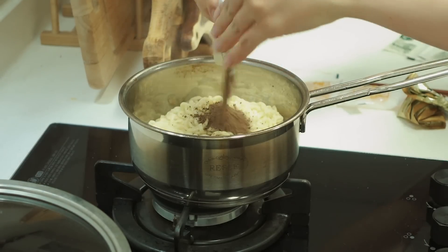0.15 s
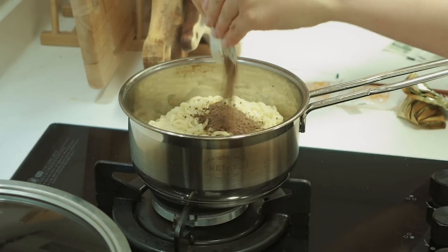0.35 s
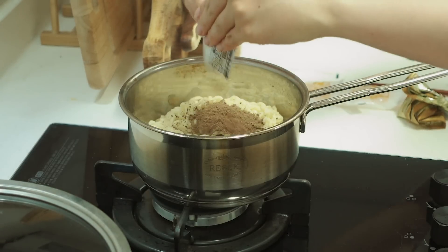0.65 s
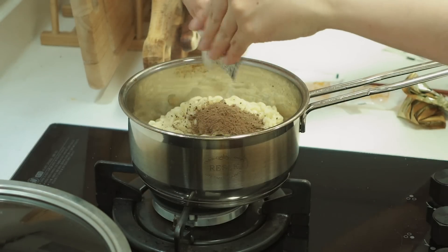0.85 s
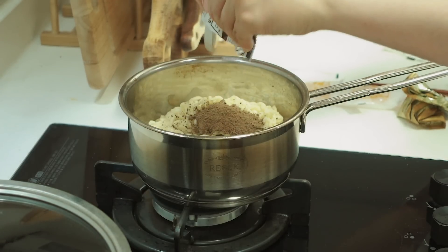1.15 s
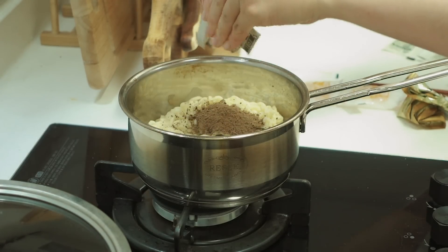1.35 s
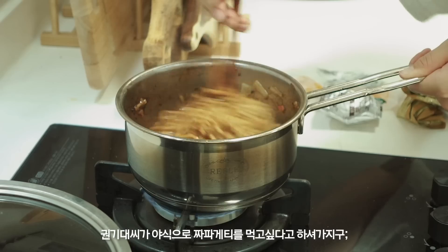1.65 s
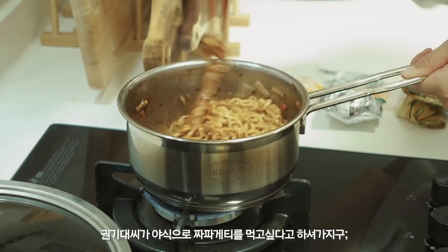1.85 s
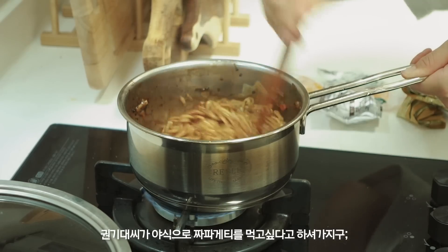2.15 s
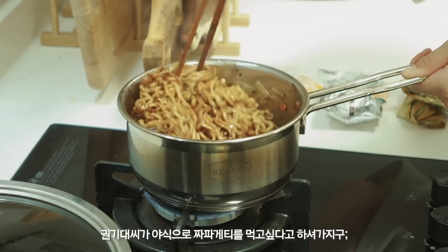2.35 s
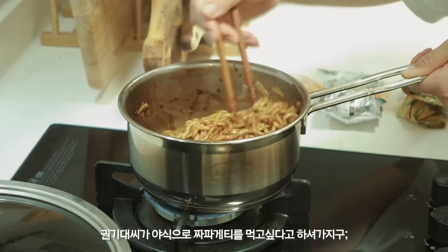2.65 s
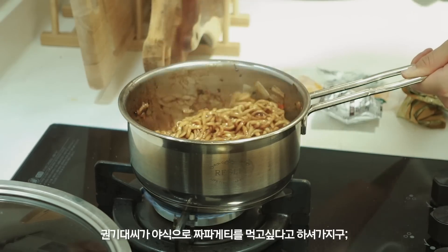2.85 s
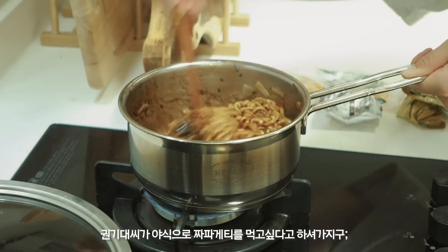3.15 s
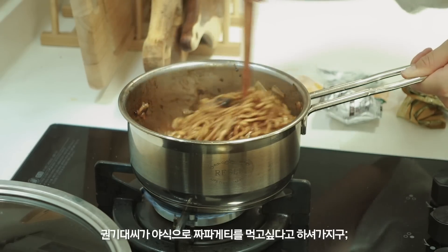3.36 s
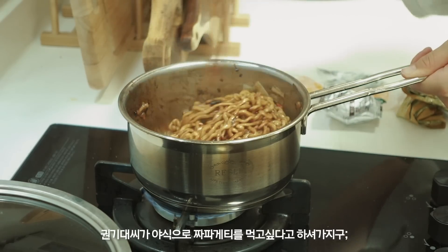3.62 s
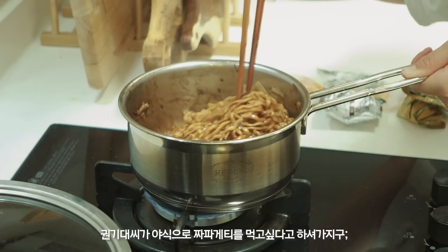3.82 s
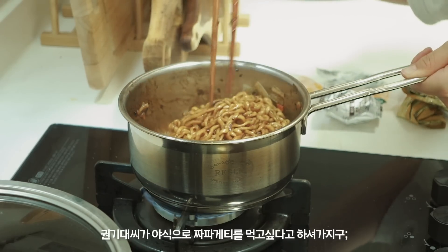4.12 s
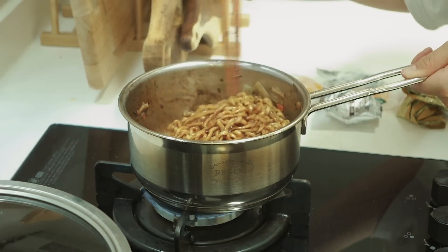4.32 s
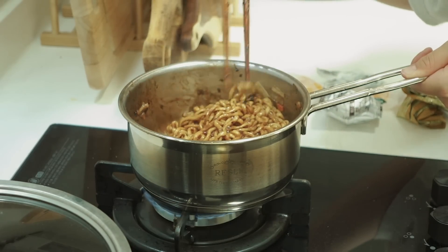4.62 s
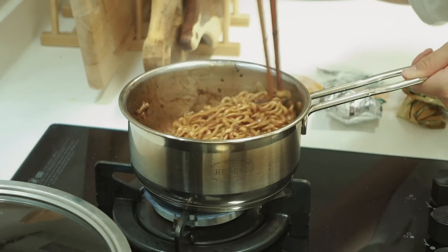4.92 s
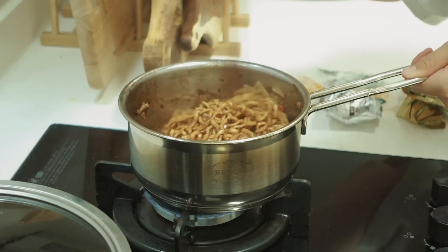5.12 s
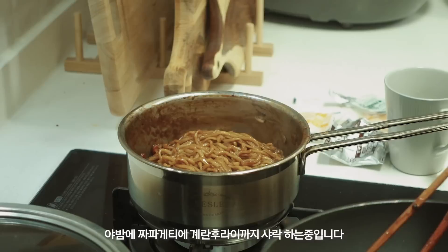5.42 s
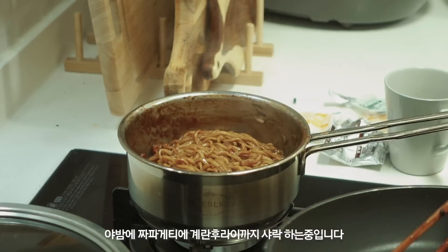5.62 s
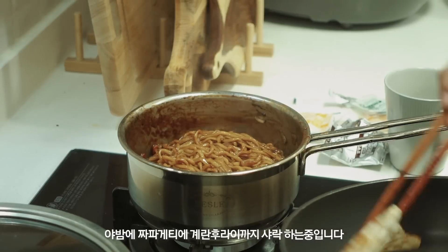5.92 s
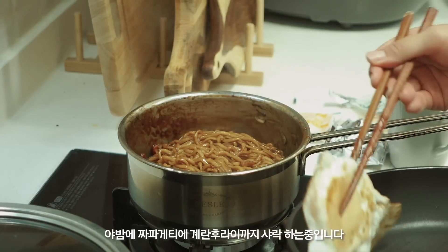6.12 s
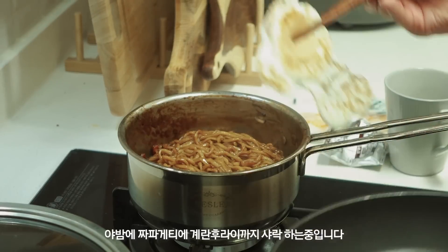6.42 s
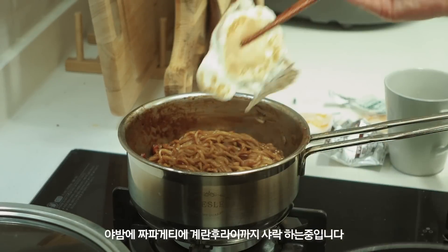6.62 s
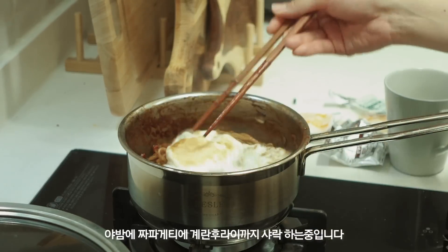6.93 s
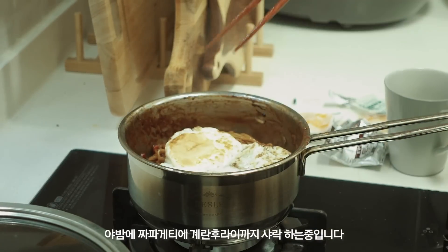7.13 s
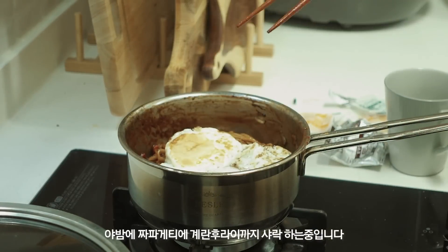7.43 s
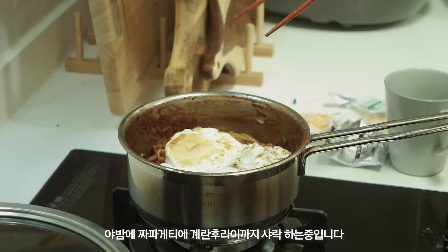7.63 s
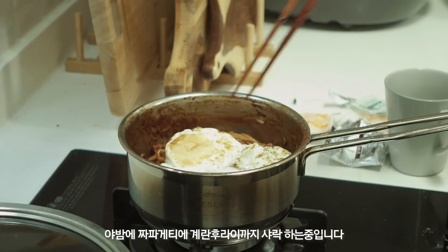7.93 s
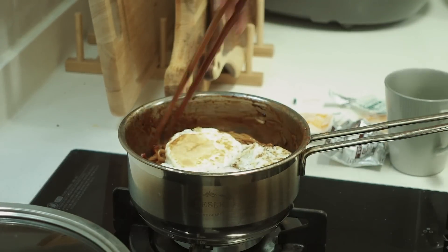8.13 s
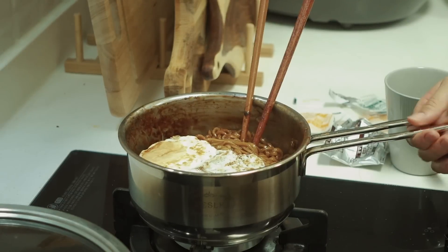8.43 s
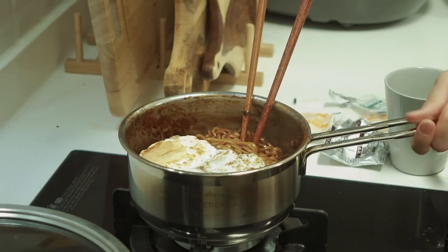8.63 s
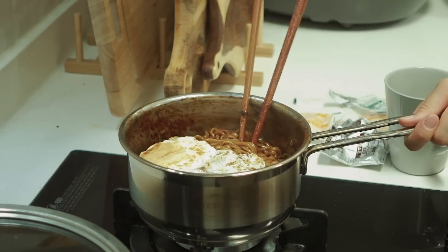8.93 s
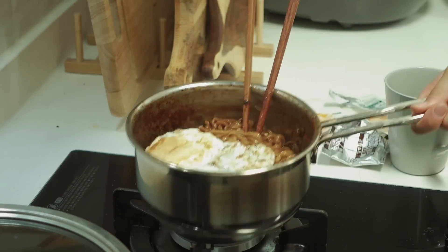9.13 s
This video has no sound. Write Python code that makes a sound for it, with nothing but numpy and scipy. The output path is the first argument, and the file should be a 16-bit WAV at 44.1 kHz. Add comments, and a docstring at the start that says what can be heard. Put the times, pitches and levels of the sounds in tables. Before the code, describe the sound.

A foil sachet crinkles, then noodles sizzle in a steel saucepan as chopsticks click and the pan knocks, over a fan's hum.

```python
"""A foil sachet taps and crinkles as it is shaken out over a steel saucepan.
Then noodles in sauce sizzle and spit while chopsticks stir them: a hiss of steam full of tiny pops.
The pan squeaks as it sticks and slips on its grate, and rings when knocks land on the hob.
Behind it all an extractor fan hums, and the small kitchen adds a short echo."""
import sys
import numpy as np
from scipy import signal
from scipy.fft import rfft, irfft, next_fast_len
from scipy.io import wavfile
from scipy.ndimage import uniform_filter1d

SR = 44100
rng = np.random.default_rng(int(sys.argv[2]) if len(sys.argv) > 2 else 0)


def materialize(psi):
    """Save the field psi as 16-bit PCM at rate SR to the path in sys.argv[1].

    A 1-D psi becomes a single channel; in a 2-D psi each row is a channel.
    """
    bounded = np.clip(np.atleast_2d(psi).T, -1, 1)
    quanta = np.round(bounded * 32767).astype(np.int16)
    wavfile.write(sys.argv[1], SR, quanta)


N = 408807
TIME = np.arange(N) / SR


def undb(db):
    """Turn decibels into a plain gain."""
    return 10 ** (np.asarray(db) / 20)

def unit(x):
    """Scale a sound to an average (rms) level of 1."""
    return x / np.sqrt(np.mean(x ** 2))

def fade(n, fade_s):
    """A fade n samples long. A fade time is always the time taken to drop by 60 dB."""
    return 1000. ** (-np.arange(n) / (fade_s * SR))

def colour(x, db_of):
    """Change the tone with a curve that gives a gain in dB for each frequency."""
    size = next_fast_len(x.shape[-1])
    hz = np.fft.rfftfreq(size, 1 / SR) + 1
    return irfft(rfft(x, size) * undb(db_of(hz)), size)[..., :x.shape[-1]]

def curve(table):
    """Join (frequency [Hz], level [dB]) points into a tone curve."""
    hz_points, db_points = np.transpose(table)
    return lambda hz: np.interp(np.log(hz), np.log(hz_points), db_points)

def band(x, low_hz, high_hz):
    """Keep the sound between two frequencies."""
    return signal.sosfilt(signal.butter(2, [low_hz, high_hz], "band", fs=SR, output="sos"), x)

def ring(push, tones):
    """A pushed object rings with several tones, each fading at its own speed."""
    sound = 0
    for hz, db, fade_s in tones:
        pole = np.exp(2j * np.pi * hz / SR - np.log(1000) / (fade_s * SR))
        sound += undb(db) * signal.lfilter([1], [1, -pole], push).imag
    return sound

def clicks(per_s, spread_db):
    """Scattered clicks of very unequal size."""
    hits = (rng.random(N) < per_s / SR) * rng.standard_normal(N)
    return unit(hits * undb(spread_db * np.minimum(rng.exponential(size=N), 5)))

def wobble(per_s):
    """Glide between random values, mostly within -1 to 1."""
    step = int(SR / per_s)
    held = np.repeat(rng.standard_normal(N // step + 1), step)
    return 1.2 * uniform_filter1d(held, step)[:N]


# How wide the low and high sounds spread: (frequency [Hz], side gain [dB])
STEREO_WIDTH = [(30, 8), (120, -4.5), (2000, -2), (8000, 0.5)]
def stereo(middle, side, side_db):
    """Add the side sound on the left and subtract it on the right, to give width."""
    side = undb(side_db) * colour(side, curve(STEREO_WIDTH))
    return np.array([middle + side, middle - side])

def kitchen(x, fade_s=0.24, echo_db=-8.5):
    """The walls add a short wash of echoes, a little different for each ear."""
    t = np.arange(int(0.4 * SR)) / SR
    onset = np.clip(t / 0.001 - 1, 0, 1)
    middle, side = rng.standard_normal((2, len(t))) * fade(len(t), fade_s) * onset
    echoes = stereo(middle, side, side_db=-5.5) * undb(echo_db) / np.linalg.norm(middle)
    return x + signal.fftconvolve(x[None], echoes, axes=1)[:, :N]


# The tone of the fan's rush: (frequency [Hz], relative level [dB])
FAN_TONE = [(15, -77), (25, -32), (107, -29.5), (129, -16), (169, -20), (351, -4.5), (391, -12), (424, -3),
            (570, -5.5), (926, -18), (1390, -24), (1590, -23), (2380, -12), (2650, -51), (15700, -45)]
# Pitches that the extractor's duct boosts: (frequency [Hz], width [Hz], boost [dB])
DUCT_PEAKS = [(140, 64, 2.5), (324, 88, 4.5), (605.6, 30, 10.5), (1414, 480, 18.5)]
def extractor(level_db=-50.5):
    """The fan makes a broad rush, and the duct lifts a few pitches into a hum."""
    def db_of(hz):
        boost = sum(db / (1 + (2 * (hz - peak) / width) ** 2) for peak, width, db in DUCT_PEAKS)
        return curve(FAN_TONE)(hz) + boost
    middle, side = colour(rng.standard_normal((2, N)), db_of) * undb(0.7 * wobble(6))
    return undb(level_db) * unit(stereo(middle, side, side_db=-11.5))


# The tone of the finest spatter: (frequency [Hz], relative level [dB])
SPATTER_TONE = [(6500, -25), (9000, 7), (11500, 5), (13500, 3), (15000, -0.5), (15700, 6)]
# Pitches of the air in the pan's hollow: (frequency [Hz], width [Hz], relative level [dB])
PAN_AIR = [(1472, 265, -7.5), (2190, 546, -2), (2957, 360, -5.5), (3803, 1020, -6.5)]
def mix_bands(sounds):
    """Mix four sounds as top (fine spatter), treble (coarse), middle (air in the pan) and low (body)."""
    def filtered(top, treble, middle, low):
        air = sum((-1) ** k * undb(db) * signal.lfilter(*signal.iirpeak(hz, hz / width, SR), middle)
                  for k, (hz, width, db) in enumerate(PAN_AIR))
        return (colour(band(top, 6560, 21940), curve(SPATTER_TONE)), band(treble, 4200, 9600),
                air + 0.47 * band(middle, 1672, 4310), band(low, 590, 1570))
    click = signal.unit_impulse(8192, 4096)
    gains = [np.linalg.norm(response) for response in filtered(*[click] * 4)]
    return sum(part / gain for part, gain in zip(filtered(*sounds), gains))  # each keeps its level

def band_gains(edge_db, body_db, top_db, treble_db, edge_share, low_db):
    """Spread a sound's bright edge and duller body over the four bands, with an offset in dB for three."""
    between_db = body_db + edge_share * (edge_db - body_db)
    return undb([edge_db + top_db, between_db + treble_db, body_db, body_db + low_db])[:, None]

def bursts(table, rise_s, **tone):
    """Each row makes a sharp snap and a fading spray of finer clicks."""
    spray = unit(rng.standard_normal(N) + 0.69 * clicks(1200, spread_db=1.2))
    bounce_delays = (2 + 20 * rng.random((len(table), 2)) ** 2).astype(int)  # in samples
    bands = np.zeros((4, N))
    for (at, edge_db, body_db, fade_s, snap_db, *_), delays in zip(table, bounce_delays):
        start = int(at * SR)
        n = min(int(fade_s * SR), N - start)
        age = np.arange(n) / SR
        spurt = 0.32 + 0.33 * np.exp(-age / 0.0046)  # strongest in the first instant
        burst = spray[start:start + n] * fade(n, fade_s) * spurt * (1 - np.exp(-age / rise_s))
        # Two bounces off the pan wall give every burst its own tone.
        burst = burst + 0.44 * np.roll(burst, delays[0]) - 0.34 * np.roll(burst, delays[1])
        burst[[0, *delays]] += 3.6 * undb(snap_db) * np.array([1, 0.25, -0.2])
        bands[:, start:start + n] += band_gains(edge_db, body_db, **tone) * burst
    return mix_bands(bands)


# Brief rubs: (middle time [s], half length [s], bright edge [dB], body [dB])
RUB_SWELLS = [(1.343, 0.025, -32, -28.5), (1.487, 0.044, -35, -29.5), (5.461, 0.027, -32.5, -62),
              (7.796, 0.035, -47, -28.5), (8.525, 0.032, -74, -52), (8.993, 0.072, -89, -47.5),
              (9.165, 0.06, -46.5, -72), (9.177, 0.0096, -50, -40)]
def rubbing():
    """Rubbing makes a dense, fine crackle that swells and fades."""
    grit = unit(rng.standard_normal(N) + 1.3 * clicks(1500, spread_db=0.96))
    bands = np.zeros((4, N))
    for at, half_s, edge_db, body_db in RUB_SWELLS:
        gains = band_gains(edge_db, body_db, top_db=0.5, treble_db=7.5, edge_share=0.5, low_db=-14)
        bands += gains * np.exp(-((TIME - at) / half_s) ** 2) * grit
    return mix_bands(bands)


# The pan sliding on its grate: (peak time [s], rise [s], fall [s], start pitch [Hz], end pitch [Hz],
# level [dB], 2nd harmonic [dB], 3rd harmonic [dB], pan tone [Hz], pan tone level [dB])
PAN_SLIDES = [(1.808, .035, 0.037, 992, 1004, -29, -52, -58, 4960, -37.5),
              (2.706, .016, 0.016, 980, 1010, -21.5, -32, -48, 4330, -52),
              (2.723, .012, 0.025, 1123, 1156, -20.5, -27, -26.5, 4290, -24),
              (8.978, .012, 0.043, 1103, 1050, -37, -39.5, -45, 4360, -48),
              (9.025, .03, 0.04, 1012, 1010, -58, -40, -38, 4870, -66),
              (9.053, .03, 0.065, 960, 988, -31.5, -45, -60, 2430, -46)]
def pan_squeaks(ends_db=-23.5):
    """The pan sticks and slips fast enough to make a pitch; its unsteady grip makes each tone waver."""
    sound = np.zeros(N)
    grips = [undb(3 * wobble(150)) for _ in range(4)]
    for at, rise, fall, start_hz, end_hz, db1, db2, db3, pan_hz, pan_db in PAN_SLIDES:
        active = (TIME > at - rise) & (TIME < at + 4 * fall)
        t = TIME[active]
        slip_hz = np.interp(t, (at - rise, at + fall), (start_hz, end_hz))
        tones = [(slip_hz, db1), (2 * slip_hz, db2), (3 * slip_hz, db3), (np.full(len(t), pan_hz), pan_db)]
        for k, (hz, db) in enumerate(tones):
            late_s, linger = (0.004, 1.2) if k else (0, 1)  # upper tones peak later and last longer
            from_peak = t - at - late_s
            span = np.where(from_peak < 0, rise + late_s, fall * linger)
            swell_db = ends_db * np.abs(from_peak / span) ** 1.1
            wave = np.sqrt(2) * np.sin(2 * np.pi * np.cumsum(hz) / SR)
            sound[active] += undb(db + swell_db) * grips[k][active] * wave
    return band(sound, 700, 15000)


# The steel pan's own tones: (frequency [Hz], relative level [dB], fade time when free [s])
PAN_TONES = [(995, -1, 0.095), (1550, -15, 0.12), (1795, -14.5, 1), (2150, -16, 0.19), (2443, -14, 0.64),
             (3080, -12, 0.34), (3200, -29, 0.1), (4140, -9.5, 0.35), (4950, -7, 0.34), (5830, -17, .2),
             (5910, -14, .2), (7180, -37, .15)]
# Knocks on the hob: (time [s], bright edge [dB], body [dB], fade time [s], snap over spray [dB],
# thud [dB], dull ring [dB], bright ring [dB], how freely the pan rings [0-1])
HOB_KNOCKS = [(2.4613, -33, -13.5, 0.092, 1.5, -55, -58, -70, .3),
              (2.8302, -23, -21, 0.068, 3, -64, -60, -70, .3),
              (3.0389, -23, -15.5, 0.1, 3, -69, -62, -70, .3),
              (5.127, -32, -33, 0.079, -4, -65, -48.5, -64, 0.66),
              (7.7461, -18.5, -16.5, 0.45, 0, -38.5, -39, -31, 0.1),
              (7.8208, -31, -22, .11, 7, -38, -64, -65, .3),
              (8.1859, -14.5, -16.5, 0.28, 3, -26, -34, -38.5, 0.32),
              (8.467, -54, -31, 0.28, 3, -50, -54, -48.5, 0.64),
              (8.557, -63, -38, .1, 0, -65, -68, -62, 0.24),
              (9.0363, -61, -37, 0.59, -4, -53, -45, -60, 0.86)]
def hob_knocks(from_s, to_s):
    """Each knock in this time span clacks, thuds and rings the pan; a held pan rings only briefly."""
    knocks = [row for row in HOB_KNOCKS if from_s <= row[0] < to_s]
    thuds, rings = np.zeros((2, N))
    noise = rng.standard_normal(N)
    rumble = unit(band(noise, 212, 414))
    for at, _, _, fade_s, _, thud_db, dull_db, bright_db, free in knocks:
        start = int(at * SR)
        n = min(int(fade_s * SR), N - start)
        thuds[start:start + n] += undb(thud_db) * rumble[start:start + n] * fade(n, fade_s)
        n = min(SR // 2, N - start)
        blow = noise[start:start + n] * np.exp(-np.arange(n) / 250)
        tones = [(hz, db + (dull_db if hz < 4000 else bright_db),
                  ring_s * (free ** 2 if hz < 2000 else free)) for hz, db, ring_s in PAN_TONES]
        rings[start:start + n] += ring(blow, tones)
    clacks = bursts(knocks, rise_s=0.00093, top_db=0.62, treble_db=2.7, edge_share=0.67, low_db=0.17)
    return clacks + band(thuds, 67, 1700) + band(rings, 480, 13300)


# Chopstick touches: (time [s], bright edge [dB], body [dB], fade time [s], snap over spray [dB])
CHOPSTICK_HITS = [(1.8406, -19, -25, 0.09, 3.5), (2.1037, -9, -21, 0.1, 4.5), (2.1174, -12, -21, 0.082, 2),
                  (2.5874, -11, -17, 0.17, 1), (2.6077, -17, -16.5, 0.12, 5), (2.633, -17, -12, 0.075, 4.5),
                  (2.6475, -16, -15, 0.14, -8), (2.6738, -18, -15, 0.09, 5),
                  (2.7571, -15, -16.5, 0.11, 4.5), (3.0034, -15, -23.5, 0.09, 7),
                  (3.0233, -14, -11, 0.17, 2), (3.1014, -24, -19.5, 0.09, 7), (3.1124, -25, -19, 0.097, 4),
                  (3.1512, -31, -22.5, 0.1, 8), (3.3365, -26, -20, 0.1, 2), (3.6102, -31, -25, 0.073, 6.5),
                  (3.6372, -13, -14, 0.12, 2), (4.2437, -10, -18.5, 0.09, -1), (4.7014, -24, -34, 0.09, 5),
                  (4.7132, -14, -28, 0.073, 2), (5.333, -23, -26.5, 0.11, 5)]
def stirring():
    """Chopsticks click against the pan and the noodles."""
    return bursts(CHOPSTICK_HITS, rise_s=0.001, top_db=-8.5, treble_db=-7.5, edge_share=0.82, low_db=-14.5)


# Tones of the air in the sachet: (frequency [Hz], relative level [dB], fade time [s])
SACHET_TONES = [(770, -10, 0.033), (915, 5, 0.047), (1020, -4.5, .035), (1510, -10, 0.027)]
# Hollow taps of the sachet: (time [s], push strength [dB])
SACHET_TAPS = [(0.005, -25), (0.014, -18), (0.204, -26.5), (0.225, -34), (0.268, -31.5), (0.284, -27),
               (0.305, -23), (0.315, -21.5)]
def sachet_taps():
    """Short, rough pushes make the air in the sachet ring."""
    pushes, n = np.zeros(N), 100
    for at, db in SACHET_TAPS:
        start = int(at * SR)
        pushes[start:start + n] = undb(db) * np.hanning(n) * (1 + rng.standard_normal(n)) / 20
    return band(ring(pushes, SACHET_TONES), 600, 2600)


# Crinkles of foil: (time [s], bright edge [dB], body [dB], fade time [s], snap over spray [dB])
FOIL_SNAPS = [(0.097, -16, -22.5, 0.035, -3), (0.128, -26, -30, 0.079, -8), (0.2319, -38, -27, 0.048, 4),
              (0.409, -22, -28, 0.16, 2), (0.4806, -8, -16, 0.15, 1), (0.611, -12.5, -12, 0.12, -1),
              (0.648, -16, -40, 0.15, 1), (0.719, -21, -26, 0.048, 4.5), (0.7462, -23, -38, 0.072, 3),
              (0.8565, -27, -35, 0.075, 3), (0.9128, -13, -20, 0.18, -2), (0.9883, -9, -25, 0.08, 0),
              (1.0154, -30, -10, 0.15, 2.5), (1.0654, -24, -22, 0.18, 0), (1.116, -20, -29, 0.12, -4),
              (1.1617, -26, -32, 0.069, 0), (1.2098, -16.5, -21.5, 0.075, -0.5),
              (1.2538, -9, -11, 0.056, 0.5), (1.305, -14.5, -34, 0.15, 0), (1.4102, -19, -27, 0.058, 1),
              (1.4674, -9, -25, 0.1, -1), (1.662, -15, -22.5, 0.073, -4.5)]
def foil_crinkles():
    """The shaken foil creases with small, bright snaps."""
    return bursts(FOIL_SNAPS, rise_s=0.0012, top_db=0, treble_db=-0.5, edge_share=0.8153, low_db=-12)


FOIL_ENDS_S, RING_STOPS_S = 1.75, 8.25
# Loudness of the foil's rustle, then of the frying: (time [s], fine sizzle [dB], pan's hollow [dB])
SIZZLE_LEVELS = [(0.0, -41, -42), (0.95, -42.5, -41), (1.13, -44, -36), (1.42, -39, -42.5),
                 (1.81, -47, -46), (2.07, -48, -50.5), (2.24, -35, -40.5), (2.48, -31.5, -40.5),
                 (2.63, -32, -31.5), (3.1, -28, -34.5), (3.38, -37.5, -39.5), (4.08, -46.5, -50),
                 (5.24, -46, -47), (5.99, -39.5, -48), (6.63, -48.5, -55), (7.49, -57, -54.5),
                 (8.05, -60.5, -50), (8.24, -72, -56), (8.91, -71.5, -59.5), (9.27, -75, -55)]
def sizzle():
    """Steam hisses and bubbles of each size pop separately; at first the same noise is rustling foil."""
    times, fine_db, hollow_db = np.transpose(SIZZLE_LEVELS)
    fine_db, hollow_db = np.interp(TIME, times, fine_db), np.interp(TIME, times, hollow_db)
    treble_db = hollow_db + 0.54 * (fine_db - hollow_db) + np.where(TIME < FOIL_ENDS_S, 1, -2)
    treble_db -= 0.4 * np.maximum(treble_db + 45, 0)  # the treble grows more slowly above -45 dB
    low_db = -52 + 0.41 * (hollow_db + 45)
    shared_flicker, shared_crackle = wobble(30), clicks(500, spread_db=2.3)
    bands = []
    for db, own_crackle in ((fine_db, 0.83), (treble_db, 1.0), (hollow_db, 0.88), (low_db, 0.42)):
        gain = undb(db + 1.6 * shared_flicker + 1.1 * wobble(18))
        hiss = rng.standard_normal(N)
        crackle = 0.93 * shared_crackle + own_crackle * clicks(400, spread_db=2.06)
        bands.append(gain * unit(hiss + crackle))
    sparkle_db = -0.5 + 0.3 * (fine_db + 40)  # the very top grows faster than the rest
    sparkle = undb(sparkle_db) * (TIME > FOIL_ENDS_S) * band(bands[0], 13000, 15200)
    return mix_bands(bands) + sparkle

def random_pops(per_s, edge_lift_db, body_lift_db, scatter_db, fade_s, snap_db):
    """Rows for pops at random moments, louder when the frying is louder."""
    gaps, edge_drop, body_drop = rng.standard_exponential((400, 3)).T
    starts = FOIL_ENDS_S + np.cumsum(gaps) / per_s
    times, fine_db, hollow_db = np.transpose(SIZZLE_LEVELS)
    edges = np.interp(starts, times, fine_db) + edge_lift_db - scatter_db * edge_drop
    bodies = np.interp(starts, times, hollow_db) + body_lift_db - scatter_db * body_drop
    return [(*row, fade_s, snap_db) for row in zip(starts, edges, bodies) if row[0] < RING_STOPS_S]


# The louder spits: (time [s], bright edge [dB], body [dB], fade time [s], snap over spray [dB])
LOUD_SPITS = [(2.0259, -8.5, -29.5, 0.24, 6.5), (2.096, -19, -28, 0.11, 4.5),
              (2.1964, -13.5, -22.5, 0.082, 4.5), (2.2317, -23, -21.5, 0.11, 1),
              (2.252, -15, -37, 0.069, 4.5), (2.3351, -12, -20, 0.15, 1.5),
              (2.4206, -36, -29.5, 0.088, 4.5), (2.4468, -30, -23.5, 0.08, 0),
              (2.5237, -28, -22.5, 0.17, 3), (2.551, -22, -18.5, 0.39, -4), (2.7686, -18, -24, 0.098, 0),
              (2.7906, -4.5, -16.5, 0.16, 1.5), (2.855, -10.5, -34, 0.22, 4.5), (2.9777, -20, -25, 0.2, 0),
              (3.093, -14, -16.5, 0.064, 7), (3.1303, -27, -17.5, 0.13, 4.5), (3.2044, -29, -16.5, 0.35, 4),
              (3.2124, -13, -23, 0.13, 1), (3.4231, -14.5, -11.5, 0.098, -1), (3.4752, -20, -20.5, 0.19, 2),
              (3.5379, -24, -36, 0.06, 3), (3.7051, -7.5, -20, 0.2, 4.5), (3.7708, -12, -29.5, 0.12, 1),
              (3.8654, -17, -50, 0.24, 1), (4.0162, -11, -35, 0.14, 2.5), (4.138, -27, -37, 0.093, -1),
              (4.235, -16.5, -38, 0.25, 0), (4.261, -15.5, -24.5, 0.16, 4), (4.422, -22, -31.5, 0.11, 2),
              (4.9076, -16.5, -49, 0.19, 2), (5.018, -16, -36, 0.13, 2.5), (5.1674, -21, -30, 0.13, -3),
              (5.2405, -18, -36, 0.1, 6.5), (5.459, -21.5, -37, 0.12, 4.5), (5.5288, -21, -44, 0.16, 1),
              (5.5628, -19.5, -35, 0.18, 4.5), (5.5906, -23, -30.5, 0.14, 1), (5.8323, -19, -38, 0.2, 0),
              (5.861, -24, -42, 0.18, -1), (5.9457, -10.5, -22, 0.21, 2), (5.971, -19, -35, 0.15, 2),
              (6.0357, -22, -32, 0.077, 7), (6.135, -14, -30.5, 0.39, -3), (6.1732, -8.5, -21.5, 0.15, 5),
              (6.4035, -20.5, -33.5, 0.12, 6), (6.4822, -13, -30, 0.2, 2), (6.5007, -21.5, -40, 0.16, 7),
              (6.7212, -21, -35, 0.1, 4.5), (6.8197, -22.5, -41, 0.27, -1), (6.996, -24.5, -47, 0.13, 0),
              (7.0984, -24, -34.5, 0.2, -11), (7.1696, -24.5, -44, 0.052, 6),
              (7.2443, -20.5, -35.5, 0.23, -2), (7.5374, -20.5, -38, 0.15, 4.5),
              (7.7099, -25, -43, 0.08, 2), (7.9497, -19.5, -39, 0.07, 4), (7.9688, -28, -52, 0.13, 7),
              (8.035, -30, -40, 0.13, 4), (8.1297, -29, -40, 0.39, 2)]
def spitting():
    """Hot sauce and fat spit, with smaller spits and short pops in between."""
    small = random_pops(3.4, edge_lift_db=25, body_lift_db=2.7, scatter_db=1.2, fade_s=0.1, snap_db=1.9)
    pops = random_pops(18, edge_lift_db=11.6, body_lift_db=11, scatter_db=4.7, fade_s=0.049, snap_db=7)
    spits = list(LOUD_SPITS) + small + pops
    return bursts(spits, rise_s=0.00094, top_db=-5, treble_db=-5.5, edge_share=0.74, low_db=-13.5)


def scene():
    """Put the cooking in the kitchen, over the hum of the extractor."""
    cut_short = np.interp(TIME, (RING_STOPS_S, 8.254), (1, 0))  # the loud knock and its echo stop dead
    early_knocks = kitchen(hob_knocks(0, RING_STOPS_S)) * cut_short
    late_knocks = hob_knocks(RING_STOPS_S, N / SR)
    sachet = foil_crinkles() + sachet_taps()
    cooking = spitting() + stirring() + rubbing() + sizzle() + pan_squeaks()
    return kitchen(sachet + cooking + late_knocks) + early_knocks + extractor()

def record(dry, top_hz=15700):
    """The microphone cuts off the highest treble."""
    return signal.sosfilt(signal.ellip(10, 0.2, 70, top_hz, fs=SR, output="sos"), dry)


dry = scene()
out = record(dry)
materialize(out)
```